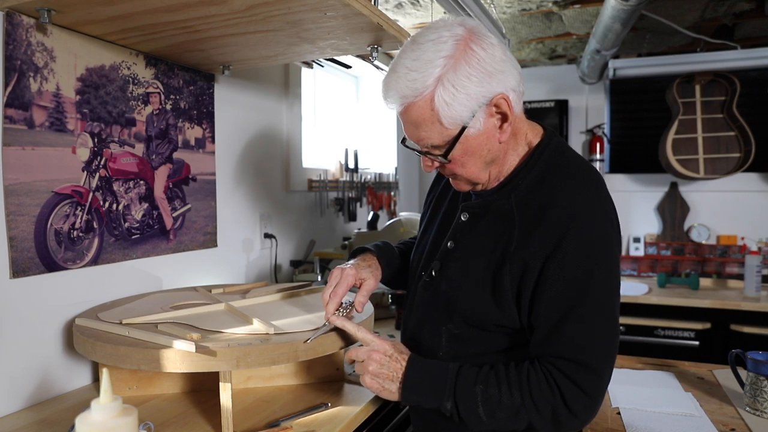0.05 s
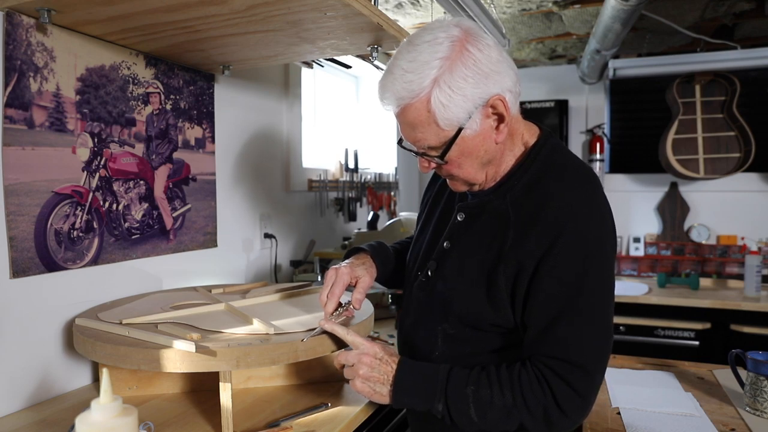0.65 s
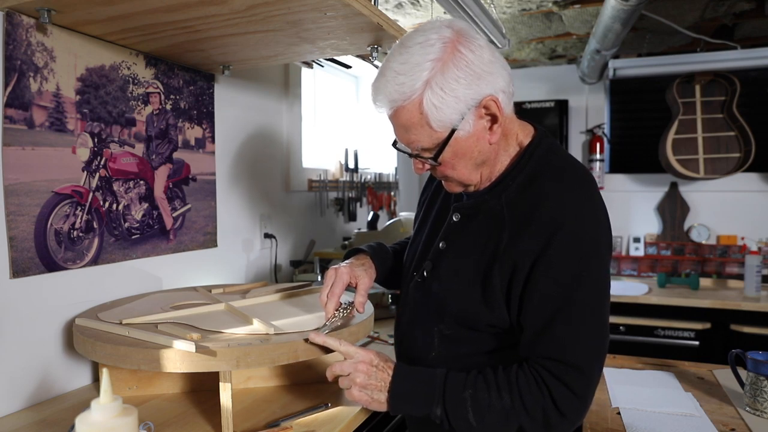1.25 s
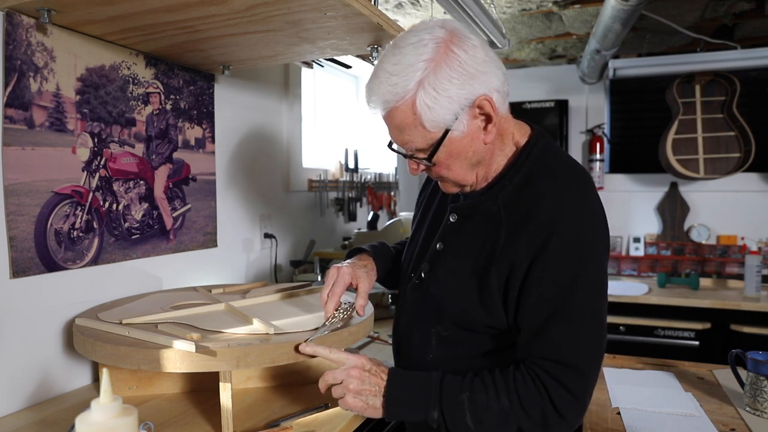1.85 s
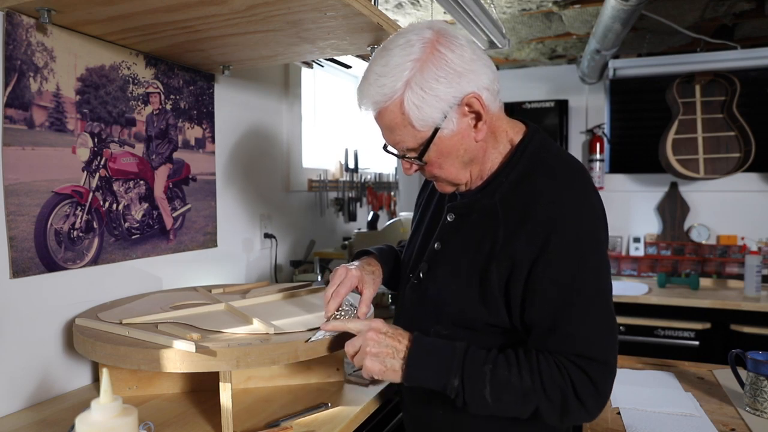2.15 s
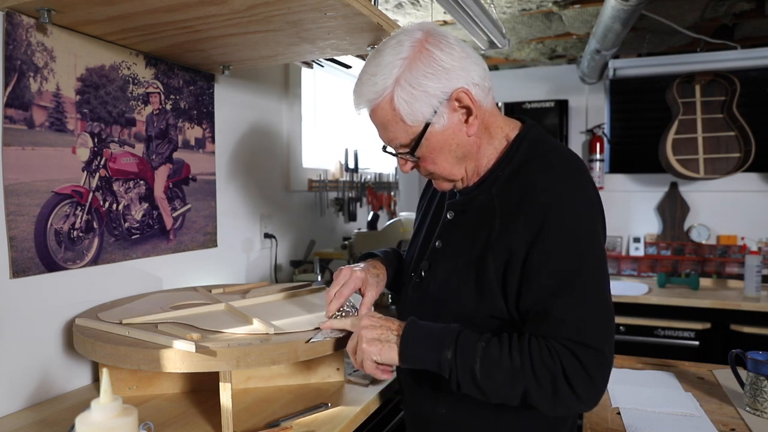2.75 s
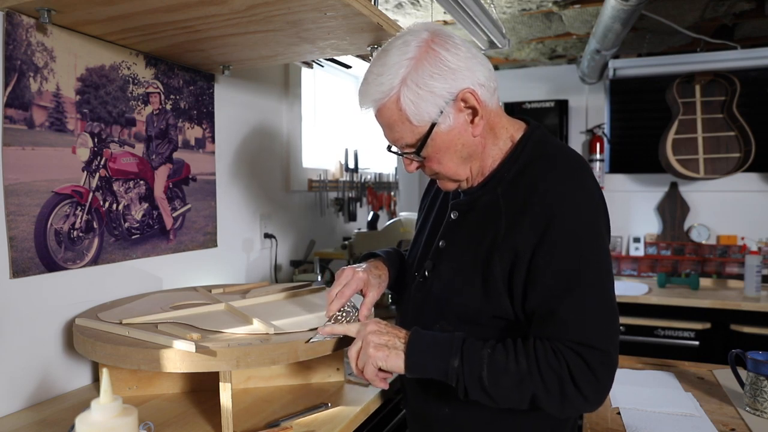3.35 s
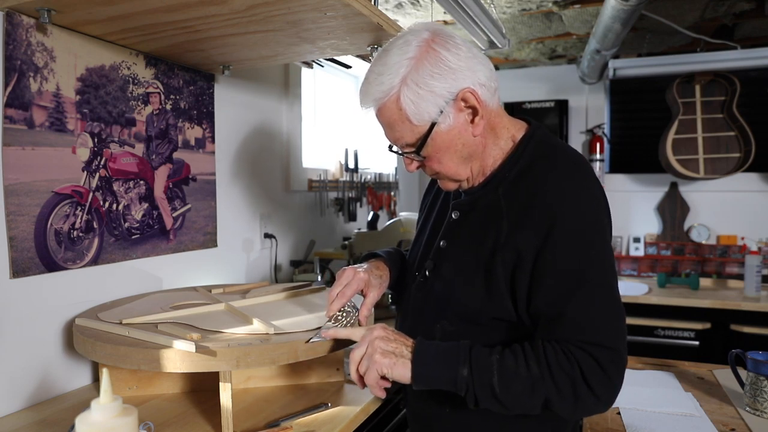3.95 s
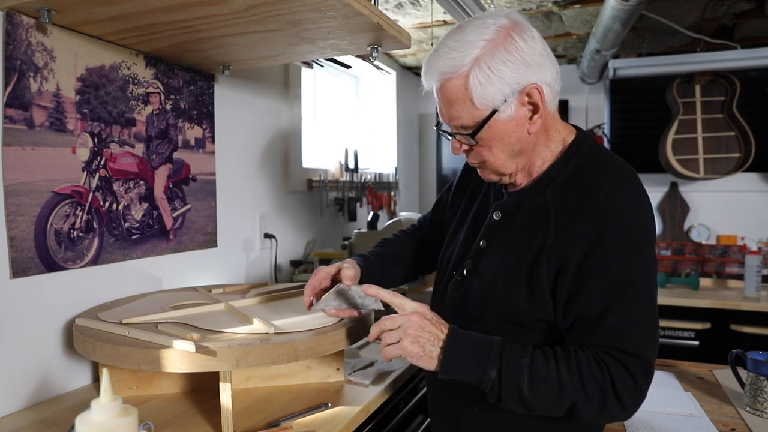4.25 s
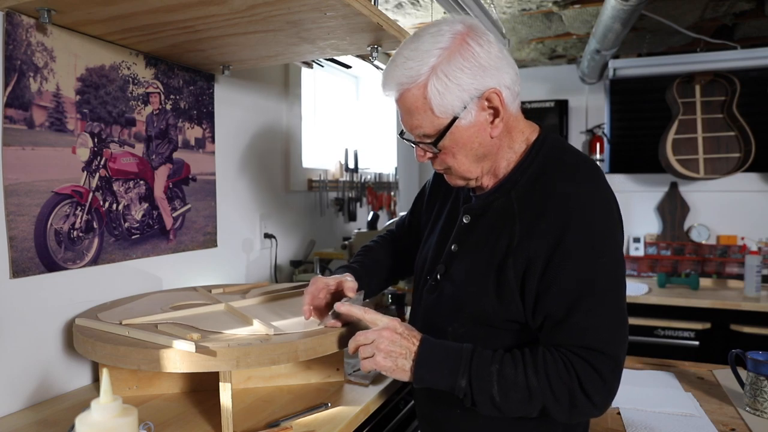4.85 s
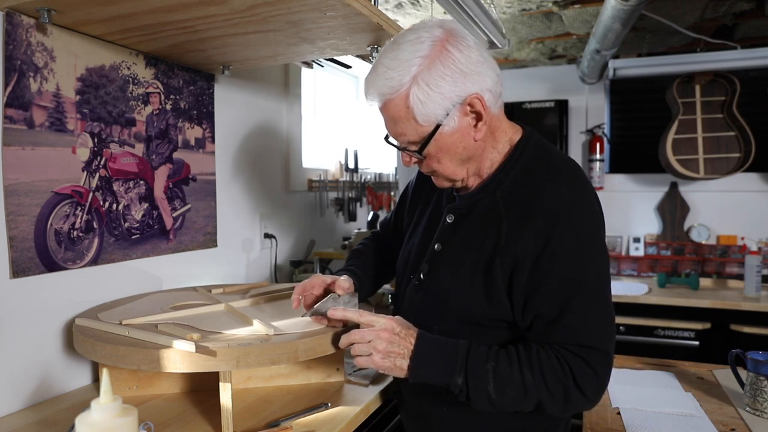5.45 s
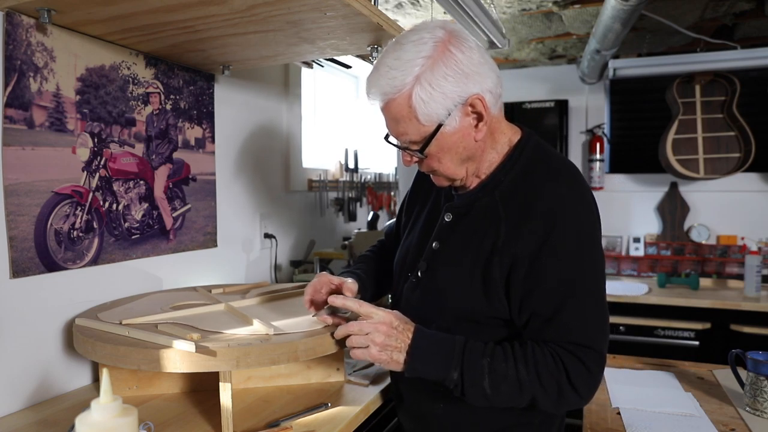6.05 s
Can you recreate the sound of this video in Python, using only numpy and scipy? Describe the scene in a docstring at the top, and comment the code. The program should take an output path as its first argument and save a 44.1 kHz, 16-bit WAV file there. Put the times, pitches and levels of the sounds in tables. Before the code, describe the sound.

Heard up close in a small, quiet workshop, a blade makes short, dry scrapes and ticks on a thin wooden panel, growing louder and then fading. A lull leaves only a faint hum and a slight swish of fingers. A few hollow knocks and a dull bench thud lead into more quick scraping, crisper this time, with a brief squeak and another soft thud at the end.

```python
"""Scraping glue at the workbench

One microphone, close to the work, in a small workshop with a faint hum. A hand tool scrapes glue from
a wooden strip on a thin panel in two runs of quick, light strokes: the edge slips and snaps over the
fibres, and tool and panel ring. Between the runs fingertips brush the wood, and the tool is turned
round and knocks on it. In the new grip it sounds brighter and creaks once; the bench thuds softly."""
import sys
import numpy as np
from scipy import signal
from scipy.fft import rfft, irfft, next_fast_len
from scipy.io import wavfile

SR = 44100
rng = np.random.default_rng(int(sys.argv[2]) if len(sys.argv) > 2 else 0)


def int16_out(signal):
    """Quantize to a 16-bit WAV file."""
    q = np.round(np.clip(np.atleast_2d(signal).T, -1, 1) * 32767)
    wavfile.write(sys.argv[1], SR, q.astype(np.int16))


N = 268877
TAPS = 4096  # length of the ring of tool and panel, in samples
BINS = np.fft.rfftfreq(TAPS, 1 / SR)

# room tone, the still air at the microphone: (frequency [Hz], relative level [dB])
AIR_SPECTRUM = [(15, -51.5), (25, -17), (107, -7), (161, -12), (179, -9), (211, -15), (241, -5.5),
                (269, -12), (361, -12.5), (557, -17.5), (749, -16.5), (1730, -26), (8970, -31.5),
                (10800, -30), (15800, -32)]
# the workshop's hum: (frequency [Hz], rms level [dB])
HUM_TONES = [(120, -84), (193, -72), (240, -64.5), (678, -81)]
# how long the room rings: (frequency [Hz], time to fall 60 dB [s])
ROOM_T60 = [(250, .26), (1000, .2), (3000, .16), (12000, .13)]
# colour of the room's tail: (frequency [Hz], level [dB])
ROOM_COLOUR = [(250, -7), (900, -8), (2000, -11), (6000, -13), (14000, -13.5)]
# the hands settle on the bench: (time [s], level [dB], pitch [Hz], decay [s])
THUDS = [(4.408, -43, 85.5, 0.025), (4.435, -50, 44.3, .07), (6.06, -45, 117, 0.037)]
# fingertips on the wood in the pause: (middle [s], half length [s], level [dB])
BRUSHES = [(2.652, .07, -70), (2.85, .04, -72), (2.965, .04, -60)]
# colour of skin on wood: (frequency [Hz], relative level [dB])
BRUSH_COLOUR = [(2000, -25), (5500, -6), (8500, -6), (11300, 2), (15500, -3)]
# the course of one short creak: (time [s], pitch [Hz], level [dB])
CREAK_PATH = [(5.879, 730, -40), (5.887, 772, -26.5), (5.896, 867, -35), (5.906, 875, -35),
              (5.925, 990, -54)]
# broad colour of tool and panel in each grip: (frequency [Hz], relative level [dB])
FIRST_COLOUR = [(120, -25), (200, -4.5), (330, -12), (1000, -10), (1500, -8.5), (2000, -1.5), (2600, -13),
                (2950, -18), (3700, -18.5), (5200, -19), (10000, -18), (15500, -21)]
SECOND_COLOUR = [(120, -11.5), (200, -19.5), (330, -1.5), (1000, -2.5), (1500, 0), (2000, -4.5),
                 (2600, -2.5), (2950, -11.5), (3700, -7.5), (5200, -10), (10000, -17.5), (15500, -8.5)]
# resonances of tool and panel in each grip: (frequency [Hz], width [Hz], height [dB])
FIRST_MODES = [(224,23,5.6), (352,20.5,18.2), (464,8,13.6), (687,47,12.8), (813,62,8.2), (940.5,29,16.3),
               (1307,32,22.6), (1400,12,15.7), (1598,40,12.5), (2080,100,2.3), (2223,105,10.5),
               (2500,180,14.5), (3296,180,12), (4350,63,2.9), (6900,400,0.72), (8520,120,4.5), (10140,69,4)]
SECOND_MODES = [(242,31.4,19.6), (390,58,12.2), (510.5,26,11.8), (596,41,4.3), (907,77,7.1), (950,71,6.9),
                (1160,76,8.4), (1313,70,14.3), (1577,80,13.6), (1726,270,15.3), (2001,100,14.9),
                (2684,310,11.5), (3235,154,10.5), (5860,190,7.3), (6940,370,11.5), (8350,1000,13.5),
                (9840,670,13.5), (11520,510,14.4), (13340,440,10.7), (15500,150,4)]
# light, even rubs on the wood: the edge resting between strokes, and from 4.45 to 5.07 s the handling as the
# tool is turned round: (start [s], end [s], relative level [dB])
DRAGS = [(0, 0.195, -63), (.66, .8, -68.5), (.835, .865, -55), (1.0, 1.02, -54), (1.748, 1.887, -61),
         (2.062, 2.12, -53.5), (4.288, 4.385, -66), (4.45, 4.54, -53), (4.596, 4.631, -54.5),
         (4.738, 4.821, -51), (4.821, 4.908, -57.5), (4.955, 5.07, -56.5), (5.242, 5.283, -41.5),
         (5.486, 5.533, -53.5)]
# the edge lands or catches hard:
# (time [s], peak [dB], contact time [s], panel boom [dB], edge hiss [dB], wood ring [Hz])
KNOCKS = [(.081, -33, 0.0019, -6, -6, 1280), (.429, -34.5, 0.0027, -8, -2, 2270),
          (0.591, -40, .002, -9, 9, 2160), (.609, -34.5, 0.0033, 5, 1, 378),
          (.85, -36.5, 0.0051, -6, -12, 2080), (.902, -23.5, 0.0043, -7, -8, 2070),
          (1.026, -32, 0.0023, 5, 6, 400), (1.047, -27.5, 0.0053, 5, 0, 1390),
          (1.207, -20.5, 0.0035, 2.5, 0, 1600), (1.2359, -21.5, .0015, 7.5, -12, 460),
          (1.29, -24, .002, -20, -16, 2200), (1.305, -20.5, 0.0026, -16, -12, 2080),
          (1.327, -21, 0.0037, 0, -2.5, 1260), (1.417, -23.5, .003, -11, -8, 2200),
          (1.487, -22, .005, -14, -11, 2300), (1.535, -26, .0015, 0, -18, 804),
          (2.047, -33, 0.00089, 0, -6, 2180), (2.149, -30.5, 0.00087, 4, -4, 1320),
          (2.309, -41, 0.00091, 7, 5, 3400), (3.906, -45.5, .0007, 0, 40, 3000),
          (4.213, -42, 0.00058, 16, 19, 3000), (4.407, -29, 0.0027, 7.5, -35, 1020),
          (4.431, -35, 0.0009, 8, 6, 940), (4.4999, -20, 0.0032, 7, -41, 1105),
          (5.0763, -11.5, 0.0015, -0.5, 0, 1350), (5.083, -27.5, 0.0034, 8, 0, 506),
          (5.157, -17, 0.0043, 1, -25, 1300), (5.172, -24.5, 0.0033, 13, 1, 394),
          (5.7267, -20.5, 0.0018, 8, -5, 1320), (5.854, -26, .004, 15, -13, 835),
          (5.883, -16.5, 0.0043, 0, -4, 1300), (6.052, -25.5, .003, 15, 12.5, 390)]
# the scraping strokes, each with the rings favoured at its spot:
# (start [s], end [s], relative level [dB], swell [dB], panel boom [dB], wood ring [Hz], blade ring [Hz])
STROKES = [(0.076, 0.108, -47, -4, 4, 1240, 11500), (0.304, 0.324, -52, -8, 12, 2280, 9800),
           (0.425, 0.461, -44, -1, 6, 1350, 7000), (.612, 0.646, -40, 3, 2.5, 2120, 10200),
           (0.87, 0.901, -40.5, 5, 1, 2060, 11500), (0.898, 0.95, -36.5, -15.5, 3, 1590, 11600),
           (1.025, 1.063, -34, 4.5, 9.5, 1510, 13400), (1.116, 1.144, -42.5, -8, 5, 1420, 9900),
           (1.202, 1.24, -25, -1.5, 3, 2010, 13600), (1.285, 1.333, -29.5, 4, -2, 2100, 10000),
           (1.389, 1.444, -31, -1, 1.5, 2120, 9400), (1.488, 1.545, -32.5, -8, -3, 2100, 11600),
           (1.598, 1.627, -37.5, -4.5, 3.5, 890, 10400), (1.701, 1.73, -42, -2.5, -5, 2210, 10900),
           (1.884, 1.935, -52.5, 6, -10, 1440, 9900), (2.001, 2.052, -44.5, -1, -4.5, 2160, 11700),
           (2.116, 2.157, -36.5, 6, -4, 1355, 11400), (2.275, 2.323, -55, -8, 4, 2380, 8300),
           (4.078, 4.123, -58, -9, 9, 2320, 6900), (4.403, 4.444, -50, -8, 11.5, 1000, 9700),
           (5.155, 5.188, -30, -0.5, 8.5, 409, 7060), (5.34, 5.364, -27.5, -1, 3, 1900, 7000),
           (5.404, 5.468, -31.5, -11.5, -3, 1990, 9600), (5.539, 5.557, -35.5, -3, 10, 603, 6800),
           (5.607, 5.684, -32, -8.5, -2, 1500, 7900), (5.724, 5.761, -30, -9.5, 5, 1820, 13300),
           (5.795, 5.822, -27, -5, -1.5, 1860, 14400), (5.856, 5.877, -43.5, 5, 12, 830, 9800),
           (5.88, 5.94, -27.5, -7, -4, 1980, 9600), (5.994, 6.011, -23, 5, -7, 1880, 10190),
           (6.06, 6.092, -23.5, 6.5, -5, 2000, 9500)]

# two ways to hold the tool; chatter is the stick-slip share of the friction's power, 0-1
FIRST_GRIP = dict(
    colour=FIRST_COLOUR, modes=FIRST_MODES, stroke_db=-4, chatter=.24, hiss_db=0, hiss_slope=.24,
    grain=dict(slips_per_s=150, jitter=.4, slip_s=.00064, snaps_per_s=3500, snap_spread_db=.5))
SECOND_GRIP = dict(
    colour=SECOND_COLOUR, modes=SECOND_MODES, stroke_db=-3.5, chatter=.44, hiss_db=1, hiss_slope=.18,
    grain=dict(slips_per_s=230, jitter=.35, slip_s=.001, snaps_per_s=6000, snap_spread_db=1.7))


def amp(db):
    """Decibels to gain."""
    return 10 ** (np.asarray(db) / 20)


def unit(x):
    """Scales to rms 1."""
    return x / np.sqrt(np.mean(x ** 2) + 1e-20)


def curve(points, hz):
    """Joins (frequency, value) points on a log-frequency axis."""
    f, value = np.transpose(points)
    return np.interp(np.log(hz + 1), np.log(f + 1), value)


def add(mix, s, sound):
    """Mixes a sound in at time s."""
    part = mix[max(round(s * SR), 0):][:len(sound)]
    part += sound[:len(part)]


def gate(t, start, end, rise_s, fall_s):
    """Opens softly around start and closes softly around end."""
    opening = .5 + .5 * np.tanh((t - start) / rise_s / 2)
    closing = .5 + .5 * np.tanh((end - t) / fall_s / 2)
    return opening * closing


def drift(size, hz):
    """A random wander of rms 1, up to about hz."""
    length = next_fast_len(size + SR // 4, True)
    lowpass = np.exp(-(np.fft.rfftfreq(length, 1 / SR) / hz) ** 2)
    return unit(irfft(rfft(rng.standard_normal(length)) * lowpass, length))[:size]


def coloured_noise(colour):
    """Noise of rms 1 with the given spectrum, as long as the scene."""
    gain = amp(curve(colour, np.fft.rfftfreq(N, 1 / SR)))
    return unit(irfft(rfft(rng.standard_normal(N)) * gain, N))


def room_tone(air_db=-61.5, waver=.19, wander_hz=.53):
    """Still air around the microphone and a faint, slightly wavering hum."""
    out = amp(air_db) * coloured_noise(AIR_SPECTRUM)
    for hz, db in HUM_TONES:
        cycles = np.cumsum(hz + wander_hz * drift(N, 8.9)) / SR
        out += amp(db) * unit(np.sin(2 * np.pi * cycles) * (1 + waver * drift(N, 1.9)))
    return out


def workshop(sound, echo_s=.0048, echo_db=-14, build_s=.0057):
    """The microphone hears the direct sound, one near reflection and a short, bass-heavy tail."""
    size = SR // 2
    hz, t, noise = signal.stft(rng.standard_normal(size), SR, nperseg=256)
    tail = amp(-60 * t / curve(ROOM_T60, hz)[:, None]) * (1 - np.exp(-(t / build_s) ** 2))
    band_norm = np.sqrt(size * np.mean(tail ** 2, axis=1, keepdims=True))
    tail *= amp(curve(ROOM_COLOUR, hz))[:, None] / band_norm
    response = signal.istft(noise * tail, SR, nperseg=256)[1]
    response[0] += 1  # direct path
    response[round(echo_s * SR)] += amp(echo_db)
    return signal.fftconvolve(sound, response)[:N]


def bench_thuds(rise_s=.0066):
    """The bench gives a low, damped tone as the hands settle."""
    out, t = np.zeros(N), np.arange(SR // 2) / SR
    for s, db, hz, decay_s in THUDS:
        envelope = np.exp(-t / decay_s) * (1 - np.exp(-t / rise_s))
        add(out, s, amp(db) * np.sin(2 * np.pi * hz * t) * envelope)
    return out


def fingertips():
    """A faint, high swish of skin on wood."""
    t = np.arange(N) / SR
    touch = sum(amp(db) * np.exp(-((t - middle) / half) ** 2) for middle, half, db in BRUSHES)
    return touch * coloured_noise(BRUSH_COLOUR)


def creak(jitter=.047, flutter=.28):
    """The edge grips for a moment and squeaks upward as it speeds up."""
    s, hz, db = np.transpose(CREAK_PATH)
    out, t = np.zeros(N), np.arange(s[0], s[-1], 1 / SR)
    pitch = np.interp(t, s, hz) * (1 + jitter * drift(len(t), 300))
    level = amp(np.interp(t, s, db)) * (1 + flutter * drift(len(t), 170))
    add(out, s[0], level * np.sin(2 * np.pi * np.cumsum(pitch) / SR))
    return out


def grip_at(s, turn_s=3.5):
    """How the tool is held at time s; it is turned round at turn_s."""
    return FIRST_GRIP if s < turn_s else SECOND_GRIP


def resonances(modes):
    """Gain of (frequency [Hz], width [Hz], height [dB]) peaks standing on a level of 1."""
    hz, width, db = np.transpose(modes)[:, :, None]
    power = amp(db) ** 2 / (1 + (2 * (BINS - hz) / width) ** 2)
    return np.sqrt(1 + power.sum(0))


def tool_and_panel(grip, boom_db, hiss_db, wood_hz, wood_db, blade=(7100, 550, 0), hiss_hz=3500):
    """Their ring: weight adds boom, a keen edge adds hiss, each spot favours a wood and a blade mode."""
    wood = (wood_hz, wood_hz / 13, wood_db)  # Q of 13
    peaks = resonances(grip["modes"]) * resonances([wood, blade])
    bass_db = boom_db / (1 + (BINS / 950) ** 6)
    treble_db = hiss_db * (1 - 1 / (1 + (BINS / hiss_hz) ** 6))
    gain = amp(curve(grip["colour"], BINS) + bass_db + treble_db) * peaks
    gain *= (BINS + 1) / np.hypot(BINS, 170)  # a small panel radiates little deep bass
    midrange = (BINS > 1000) & (BINS < 3500)
    gain /= np.sqrt(np.mean(gain ** 2 * midrange))
    log_gain = np.log(np.r_[gain, gain[-2:0:-1]])
    minimum_phase = np.exp(np.conj(signal.hilbert(log_gain)))  # the ring follows the contact
    return np.fft.ifft(minimum_phase).real


def blade_echo(force, delay_s=.0009, wander=.25, echo=.57, above_hz=4000):
    """Treble bounces along the blade; the path shifts with the contact point, so its peaks move."""
    treble = signal.sosfilt(signal.butter(2, above_hz, "high", fs=SR, output="sos"), force)
    lag = np.round(SR * delay_s * np.exp(wander * drift(len(force), 4.8))).astype(int)
    return force + echo * treble[np.maximum(np.arange(len(force)) - lag, 0)]


def friction(size, chatter, slips_per_s, jitter, slip_s, snaps_per_s, snap_spread_db):
    """Force at the edge: uneven stick-slip jerks over a dense crackle of snapping fibres."""
    slip_count = np.cumsum(slips_per_s * np.exp(jitter * drift(size, 150))) / SR + rng.random()
    jerks = np.diff(np.floor(slip_count), prepend=0) * rng.uniform(.4, 1.6, size)
    release = signal.lfilter([1], [1, -np.exp(-1 / (slip_s * SR))], jerks)
    slips = release * rng.standard_normal(size)
    snaps = (rng.random(size) < snaps_per_s / SR) * rng.choice([-1, 1], size)
    snaps = snaps * amp(snap_spread_db * np.minimum(rng.exponential(1, size), 4))
    return np.sqrt(chatter) * unit(slips) + np.sqrt(1 - chatter) * unit(snaps)


def touch_hiss_db(grip, db, firm_db=-30):
    """A lighter touch rides on the surface and has a larger share of hiss."""
    return grip["hiss_db"] + grip["hiss_slope"] * (firm_db - db)


def rub(t, pressure, chatter, grain, ring, hiss_gain=1, hiss_above_hz=7400, uneven_db=1.08):
    """The edge catches and runs free under pressure, and its friction rings tool and panel."""
    catching = amp(uneven_db * drift(len(t), 69.6))
    force = pressure * catching * friction(len(t), chatter, **grain)
    force *= np.linalg.norm(pressure) / np.linalg.norm(force)  # the hand's work sets the energy
    hiss = signal.sosfiltfilt(signal.butter(2, hiss_above_hz, "high", fs=SR, output="sos"), force)
    return signal.fftconvolve(blade_echo(force + (hiss_gain - 1) * hiss), ring)


def drags(gain_db=-3, chatter=.12, dull_db=-1.5, fade_s=.014):
    """Between strokes the resting edge slides softly and evenly, and while the tool is turned round the
    handling rubs the wood lightly."""
    out = np.zeros(N)
    for start, end, db in DRAGS:
        grip, t = grip_at(start), np.arange(max(start - .08, 0), end + .08, 1 / SR)
        pressure = amp(db + gain_db) * gate(t, start, end, fade_s, fade_s)
        hiss_db = touch_hiss_db(grip, db) + dull_db
        ring = tool_and_panel(grip, boom_db=2.5, hiss_db=hiss_db, wood_hz=2050, wood_db=2.5)
        add(out, t[0], rub(t, pressure, chatter, grip["grain"], ring))
    return out


def knocks(grit=.31, build_s=.00037, click=.24, click_s=.00007):
    """The edge lands or catches: a click and a short crunch ring tool and panel."""
    out, t = np.zeros(N), np.arange(TAPS // 4) / SR
    for s, db, contact_s, boom_db, hiss_db, wood_hz in KNOCKS:
        crunch = rng.standard_normal(len(t)) * (1 - np.exp(-t / build_s)) * np.exp(-t / contact_s)
        force = grit * crunch + click * np.exp(-t / click_s)
        ring = tool_and_panel(grip_at(s), boom_db, hiss_db, wood_hz, wood_db=7.5, hiss_hz=2670)
        knock = signal.fftconvolve(force, ring)
        add(out, s, amp(db) * knock / abs(knock).max())
    return out


def scrapes(rise_s=.0035, fall_s=.004, soften_per_db=.09, skim_db=-19, skim_s=.0082, slow_db=-3.5):
    """Close to the microphone, each stroke skims the wood, bites, swells or sags, and lifts off."""
    out = np.zeros(N)
    for start, end, db, swell_db, boom_db, wood_hz, blade_hz in STROKES:
        grip, t = grip_at(start), np.arange(start - .05, end + .08, 1 / SR)
        from_middle = np.clip((t - start) / (end - start), 0, 1) - .5
        attack_s = rise_s * np.exp(soften_per_db * swell_db)  # a swelling stroke starts more softly
        bite = gate(t, start, end, attack_s, fall_s)
        skim = amp(skim_db) * gate(t, start, end, skim_s, skim_s)
        pressure = amp(db + grip["stroke_db"] + swell_db * from_middle) * np.maximum(bite, skim)
        hiss_db = touch_hiss_db(grip, db)
        ring = tool_and_panel(grip, boom_db, hiss_db, wood_hz, wood_db=4.5, blade=(blade_hz, 450, 6))
        hiss_gain = amp(slow_db * (2 * from_middle) ** 2)  # a slower hand at either end hisses less
        add(out, t[0], rub(t, pressure, grip["chatter"], grip["grain"], ring, hiss_gain))
    return out


def scene():
    """The handwork up close in the workshop, over bench thuds and room tone, in mono."""
    handwork = scrapes() + drags() + knocks() + creak() + fingertips()
    return (workshop(handwork) + bench_thuds() + room_tone())[None]


def record(dry):
    """The recorder cuts the microphone's top end at its band limit."""
    lowpass = signal.firwin(511, cutoff=15950, window=("kaiser", 9), fs=SR)
    return signal.oaconvolve(dry, lowpass[None], "same")


dry = scene()
out = record(dry)
int16_out(out)
```